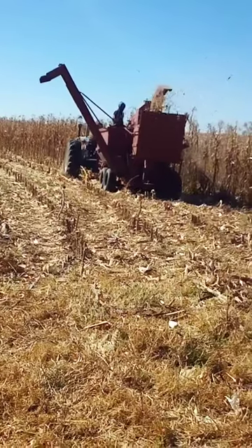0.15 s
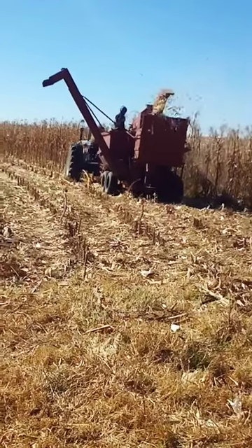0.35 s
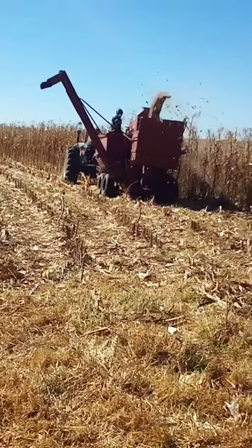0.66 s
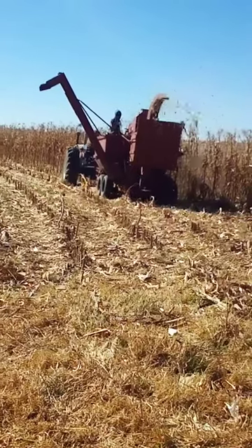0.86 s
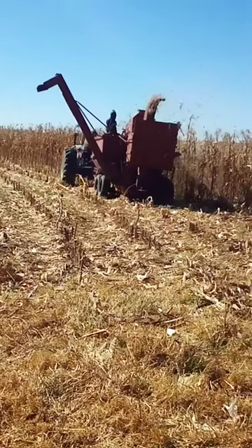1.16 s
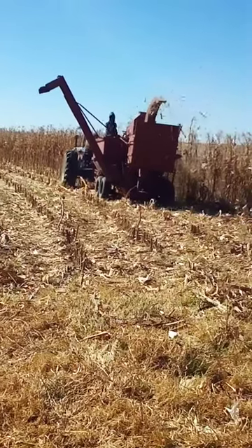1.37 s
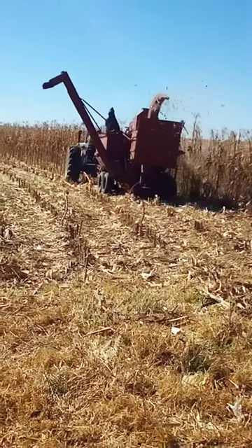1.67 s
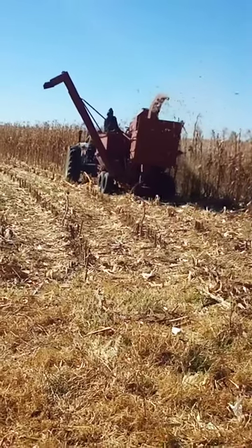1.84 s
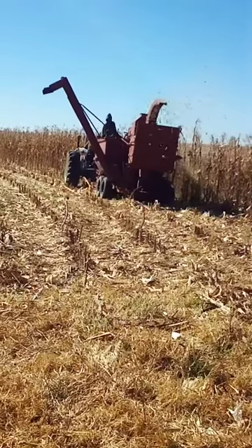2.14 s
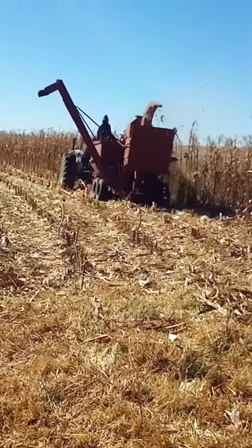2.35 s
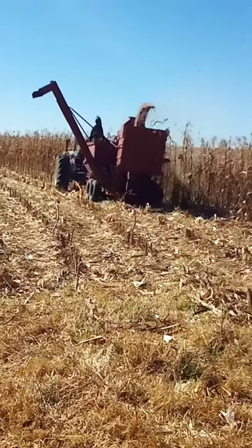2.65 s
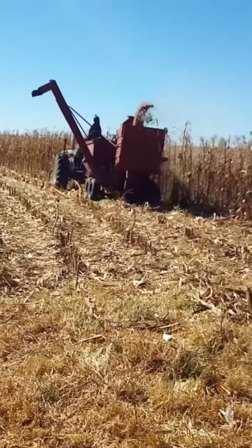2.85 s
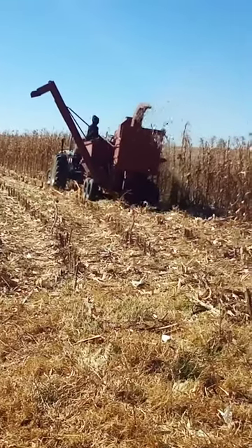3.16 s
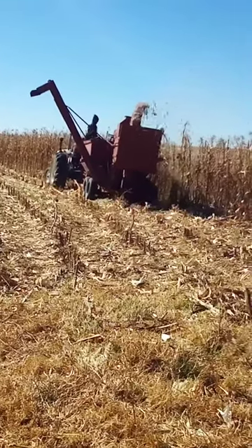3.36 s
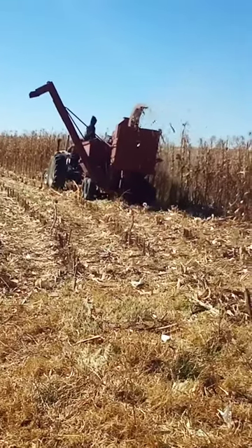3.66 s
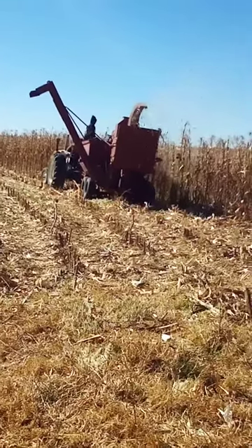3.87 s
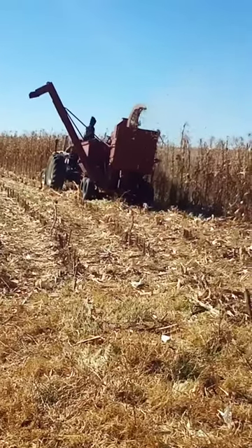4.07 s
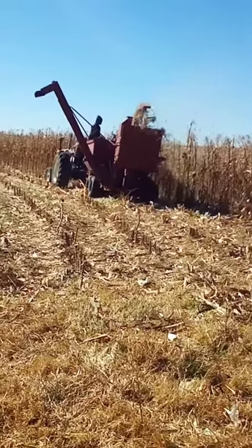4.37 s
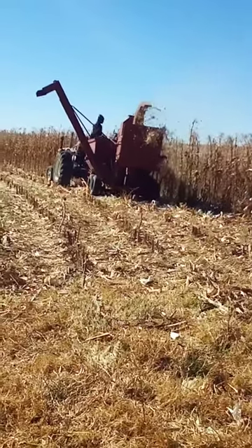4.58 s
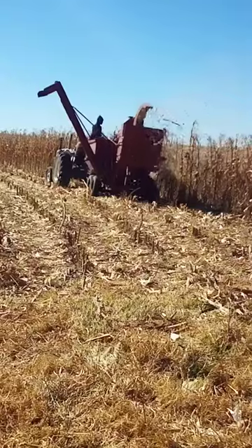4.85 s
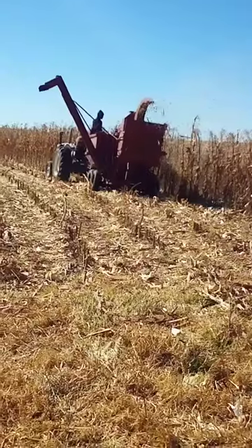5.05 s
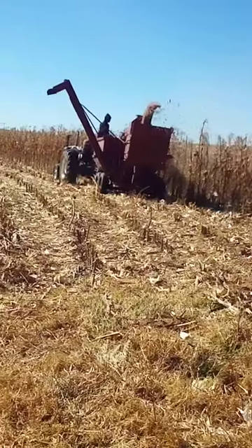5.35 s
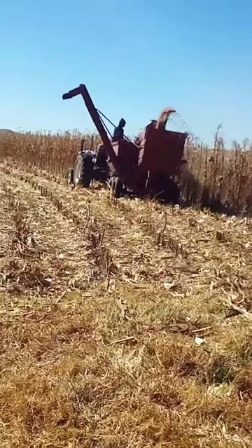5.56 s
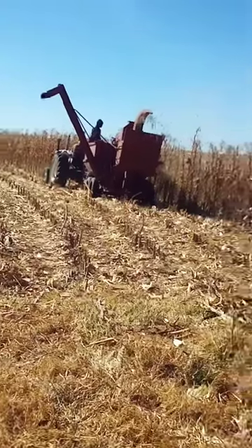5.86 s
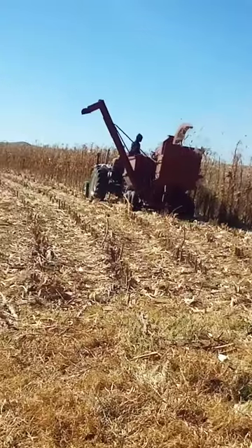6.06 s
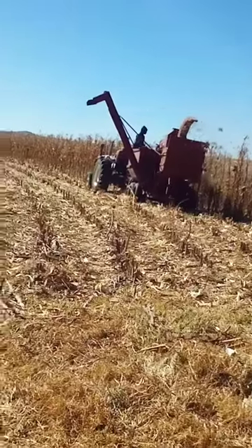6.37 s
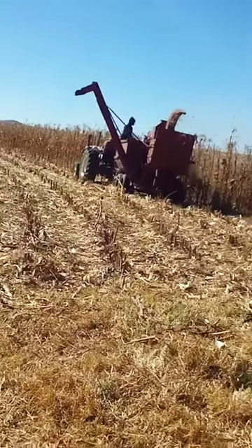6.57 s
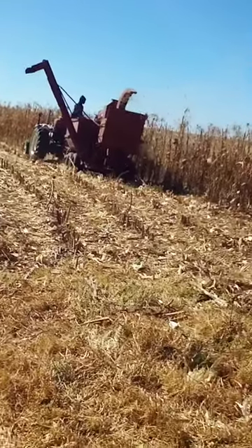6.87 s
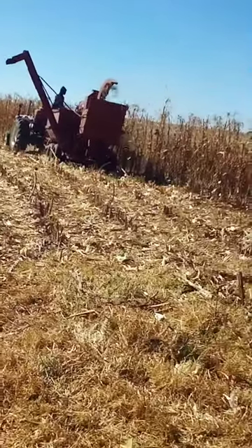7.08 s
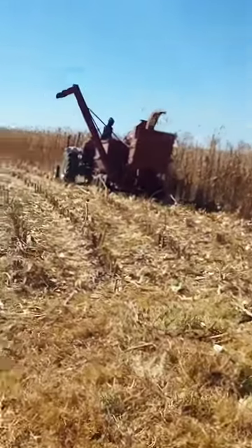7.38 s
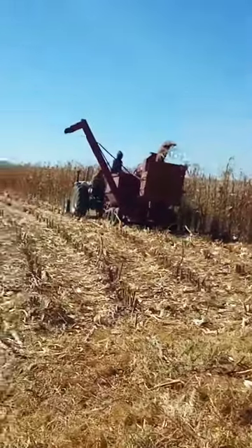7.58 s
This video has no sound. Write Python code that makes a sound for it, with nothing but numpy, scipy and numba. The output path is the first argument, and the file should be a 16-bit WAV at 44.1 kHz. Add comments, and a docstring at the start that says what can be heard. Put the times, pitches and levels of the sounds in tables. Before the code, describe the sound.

A tractor-drawn corn harvester clatters and clanks irregularly over a low engine drone, dry stalks crackling while wind gusts thump the microphone.

```python
"""On a stubble field, a tractor draws a maize harvester within hearing of a phone.
Cobs and chains clank on sheet metal: bursts of force ring banks of damped modes. Many lesser ticks and a
hiss make a steady clatter, thinned by the echo off the ground; one narrow noise band squeals as it sinks.
The engine drones in surging bands and wavering tones; dry stalks crackle in random clicks and rustle,
and one snaps; low noise in gusts, with a few sharp slaps, buffets the microphone."""
import sys
import numpy as np
from scipy import signal
from scipy.fft import rfft, irfft
from scipy.io import wavfile
from scipy.ndimage import uniform_filter1d
from numba import njit

SR = 44100
rng = np.random.default_rng(int(sys.argv[2]) if len(sys.argv) > 2 else 0)


def rack_gain(trim_db):
    """Turn a fader trim in dB into the linear factor to multiply a signal by."""
    fader = np.asarray(trim_db, float)
    return 10 ** (fader / 20)


def generate_wav(signal):
    """Clip the signal to [-1, 1] and save it as 16-bit WAV at the path in sys.argv[1]."""
    frames = np.transpose(np.atleast_2d(signal))
    scaled = np.clip(frames, -1, 1) * 32767
    pcm = np.round(scaled).astype(np.int16)
    wavfile.write(sys.argv[1], SR, pcm)


N = 340452  # length [samples]

# Blows on the metal:
# (time [s], drum gain [dB], chute gain [dB], small-part gain [dB], nominal rattle length [s])
BLOWS = [(0.171, -47, -43, -52, 0.032), (0.315, -50, -41, -49, 0.065), (1.155, -40, -34.5, -62, 0.067),
         (1.227, -42.5, -51.5, -63, 0.043), (1.312, -46.5, -75, -40, 0.079),
         (1.483, -39, -36.5, -43, 0.048), (1.778, -44.5, -73, -39, 0.041), (2.576, -33, -42.5, -33, 0.013),
         (2.584, -34, -40, -37, 0.045), (2.957, -35, -48, -43, 0.073), (3.345, -41.5, -40.5, -70, 0.061),
         (3.49, -34, -45.5, -43.5, 0.083), (3.578, -32, -36, -68, 0.083), (3.711, -42.5, -36, -70, 0.05),
         (3.801, -39.5, -50, -62, 0.04), (3.969, -33.5, -38, -63, 0.05), (4.545, -36, -78, -43, 0.086),
         (4.669, -33.5, -58, -46, 0.069), (4.715, -31.5, -58, -36, 0.09), (4.775, -39, -43, -48, 0.046),
         (4.82, -45, -60, -68, 0.077), (4.888, -42, -70, -62, 0.1), (4.975, -39, -57, -62, 0.039),
         (5.542, -39, -80, -39, 0.06), (5.753, -35, -47.5, -47, 0.054), (6.255, -46, -45.5, -43.5, 0.055),
         (6.676, -33.5, -37.5, -72, 0.094), (6.783, -32, -42.5, -67, 0.048), (6.903, -39, -38, -47, 0.07),
         (7.058, -46.5, -46, -72, 0.037), (7.143, -37.5, -39.5, -50, 0.064), (7.207, -45, -48, -50, 0.039),
         (7.269, -39, -46, -48, 0.031), (7.332, -45.5, -42.5, -68, 0.052), (7.514, -34, -47.5, -60, 0.064),
         (7.542, -36, -38, -64, 0.08)]
# Named modes of the bodywork, before the ground echo: (frequency [Hz], level [dB], decay time T60 [s])
BODY_MODES = [(409, -24, 0.15), (630, 8, 0.086), (974, 11, 0.13), (1370, -3.5, 0.11), (1642, -1.5, 0.25),
              (2050, -10, 0.21), (2990, -3, 0.1), (3715, 10, 0.071), (6245, 6, 0.046)]
# One panel shaken on its own note: (time [s], note [Hz], gain [dB], length of the shaking [s])
PANEL_NOTES = [(0.311, 1370, -41.5, 0.013), (1.264, 2990, -59, 0.03), (2.599, 974, -49, 0.095),
               (2.846, 1642, -48, 0.045), (2.819, 2050, -47, 0.058), (2.968, 1642, -46.5, 0.037),
               (3.512, 860, -43, 0.046), (3.597, 2990, -50, 0.094), (3.975, 1642, -34.5, 0.098),
               (3.983, 2050, -44.5, 0.018), (3.989, 974, -44, 0.054), (4.033, 2990, -49, 0.055),
               (4.388, 535, -47, 0.12), (4.729, 9750, -42, 0.0089), (6.145, 409, -35.5, 0.13),
               (6.246, 974, -46.5, 0.15), (6.618, 409, -39, 0.23), (6.614, 3715, -34.5, 0.26),
               (6.968, 6250, -45, 0.097), (7.06, 2620, -41.5, 0.22), (7.185, 974, -45, 0.05),
               (7.306, 1370, -41, 0.21), (7.381, 974, -44, 0.088)]
# The running machine: (time [s], clatter gain [dB], stalk crackle gain [dB])
WORK_LEVELS = [(0.0, -53, -55.5), (1.87, -56, -55), (2.64, -54.5, -53.5), (3.59, -53, -59),
               (4.34, -55, -58.5), (4.8, -53, -58), (5.07, -55, -58), (5.55, -51.5, -56.5),
               (6.1, -56.5, -53.5), (6.84, -53, -59.5), (7.4, -57, -61.5), (7.52, -55, -48),
               (7.72, -56.5, -48.5)]
# Running noise as it arrives, with the dips of the ground echo: (frequency [Hz], relative density [dB per Hz])
GROUND_ECHO = [(500, -15), (950, -3), (1200, -4.5), (1700, 4.5), (2300, 1), (2700, -10.5), (3000, 1.5),
               (3750, 4), (4700, 0.5), (5600, -8), (6200, 1), (7900, -13.5), (9800, -1), (11500, -16)]
# Two scrapes of metal on metal: (start [s], gain [dB], length [s])
SCRAPES = [(6.665, -56.5, 0.66), (7.272, -52, 0.123)]
# Spectrum of the engine drone: (frequency [Hz], relative density [dB per Hz])
DRONE_SPECTRUM = [(35, -39), (60, -63), (130, -3), (193, -2.5), (286, -2), (355, -5.5), (413, -7),
                  (572, -26), (800, -17), (1040, -22), (1760, -120)]
# Engine and fan tones: (frequency [Hz], nominal rms level [dB])
TONES = [(129, -58.5), (282, -61.5)]
# Spectrum of dry leaves and stalks: (frequency [Hz], relative density [dB per Hz])
STALK_SPECTRUM = [(6000, -18), (8000, -12), (9800, -6), (11500, -17), (13950, -10), (14400, 0.5),
                  (15600, 5), (16000, 6.5)]
# A stalk gives, breaks and splinters: (time [s], relative level [dB])
SNAP_STEPS = [(6.8, -34), (6.8018, -27), (6.809, -36)]
# Modes of the snapping stalk: (frequency [Hz], ...)
SNAP_MODES = (4500, 5500, 6200)
# Gusts on the microphone: (start [s], length [s], gain [dB], sag from the peak to the end [dB])
GUST_TIMES = [(0, 0.094, -27, 4), (0.23, 0.14, -34, 30), (0.475, 0.068, -22.5, 8.5),
              (0.646, 0.13, -29.5, 12.5), (1.77, 0.19, -25.5, 43), (2.253, 0.13, -43, -7),
              (2.437, 0.048, -42, 1), (2.529, 0.057, -45, 4), (2.74, 0.24, -33, 12),
              (3.206, 0.25, -31.5, 24), (3.844, 0.19, -44, -8.5), (4.073, .14, -45, 2),
              (4.626, 0.082, -46, 12), (4.82, 0.043, -51, 4), (5.918, 0.029, -30.5, 11),
              (6.501, 0.045, -36, 10), (6.681, 0.05, -40, 6), (7.135, 0.058, -41.5, -1),
              (7.37, 0.06, -37.5, -1.5), (7.527, 0.069, -42, 5)]
# Spectrum of the eddies: (frequency [Hz], relative density [dB per Hz])
WIND_SPECTRUM = [(25, -24), (74, 2.5), (139, -1), (200, -9), (271, -17), (399, -24.5), (450, -32.5),
                 (580, -42), (990, -120)]
# Gain of the wind's deepest rumble: (time [s], gain [dB])
DEEP_WIND = [(0, -1.5), (1.8, 5), (4.9, 0.5), (7.0, -7.5)]
# Sharp slaps of air: (start [s], nominal peak level [dB], length [s])
AIR_SLAPS = [(0.489, -30, 0.012), (1.806, -34, 0.012), (2.787, -34, 0.017)]

TURN_S = 6.1  # the phone swings round and the echo's dips partly fill in
TURN_FILL = 0.76  # share of the ground-echo curve then taken back from blows and ticks
LAG_S = 0.006  # longest delay from a part to the next larger
PANELS_DB = -8.5  # the large panels, relative to the chute
SPRAY_DB = -11.5  # chaff thrown up by a blow, relative to its small parts
RING_SPLIT = 0.033  # spacing of a bent panel's close neighbours, as a share of the note
SQUEAL_HZ, SQUEAL_SAG_HZ_PER_S, SQUEAL_FADE_DB = 4720, 560, 9.5
DRONE_DB = -51  # rms level
SNAP_T60_S = 0.013  # decay time of the snap's lowest mode
BREEZE_DB = -53.5  # median gain of the wind between gusts
GUST_EDGE_S, GUST_RISE_SHARE = 0.021, 0.16  # half-width of a gust's edges; where in its length it peaks


def shape(table, hz):
    """Logarithmic frequency scale: interpolates a spectrum evenly in pitch."""
    log_hz, level_db = np.log(np.array(table)[:, 0]), np.array(table)[:, 1]
    return np.interp(np.log(np.maximum(hz, 1)), log_hz, level_db)


def colour(x, table, skirt_db=18):
    """Linear filtering: weights the spectrum, with skirts in dB per octave beyond the table; rms 1."""
    hz = np.maximum(np.arange(len(x) // 2 + 1) * SR / len(x), 1)
    octaves_below = np.maximum(np.log2(table[0][0] / hz), 0)
    octaves_above = np.maximum(np.log2(hz / table[-1][0]), 0)
    weight = rack_gain(shape(table, hz) - skirt_db * (octaves_below + octaves_above))
    y = irfft(rfft(x) * weight, len(x))
    return y / np.std(y)


def curve(table):
    """Slow level variation: straight lines in dB between the listed times."""
    s, *columns = np.transpose(table)
    return [np.interp(np.arange(N) / SR, s, c) for c in columns]


def walk(rate):
    """Random modulation: levels held 1 / rate s and smoothed twice over that time; standard deviation 1."""
    k = int(SR / rate)
    held = np.repeat(rng.standard_normal(N // k + 1), k)
    y = uniform_filter1d(uniform_filter1d(held, k), k)[:N]
    return y / np.std(y)


def swell(start_s, length_s, edge_s, rise_share, sag_db):
    """Envelope: a gain that comes in, peaks after a share of its length, sags and stops."""
    t = np.arange(N) / SR - start_s
    db = np.interp(t / length_s, [0, rise_share, 1], [-sag_db / 2, 0, -sag_db])
    edges = np.clip(np.minimum(t + edge_s, length_s + edge_s - t) / (2 * edge_s), 0, 1) ** 2
    return rack_gain(db) * edges


@njit
def add(out, start, push, hz, gain, t60):
    """Modal superposition: a burst of force rings damped resonators, each followed half its T60 past the burst."""
    for m in range(len(hz)):
        pole = np.exp(2j * np.pi * hz[m] / SR - np.log(1000) / (t60[m] * SR))
        z = 0j
        for i in range(min(len(push) + int(t60[m] * SR / 2), len(out) - start)):
            z = z * pole + (push[i] if i < len(push) else 0.)
            out[start + i] += gain[m] * z.imag


def bodywork(count=170):
    """Modal density: the named modes of the sheet metal stand among many others, all coloured by the echo."""
    hz, db, t60 = np.transpose(BODY_MODES)
    other_hz = np.exp(rng.uniform(np.log(620), np.log(11500), count))
    all_hz = np.r_[hz, other_hz]
    all_db = np.r_[db, np.full(count, -1.)] + 1.2 * shape(GROUND_ECHO, all_hz)
    return all_hz, all_db, np.r_[t60, 0.08 * (2000 / other_hz) ** 0.3]


def echo_fill_db(s, hz):
    """Ground interference: the part of the echo's colour to take back once the phone has turned."""
    return TURN_FILL * (s > TURN_S) * shape(GROUND_ECHO, hz)


def blow(out, modes, s, gain, rattle_s, heft=1):
    """Impact excitation: a rattle of loose parts swells, stutters and stops, ringing modes by the given gains."""
    hz, _, t60 = modes
    share = np.linspace(0, 1, int(max(rattle_s, 0.004) * SR))
    stutter = rack_gain(4.9 * np.interp(share, np.linspace(0, 1, 9), rng.standard_normal(9)))
    envelope = share ** (0.15 * heft) * (1 - share) ** 0.85
    push = rng.standard_normal(len(share)) * stutter * envelope
    push = push / np.sqrt(np.sum(push ** 2))
    # the load shifts, so the panels are never tuned quite the same
    shifted_hz = hz * (1 + 0.0157 * rng.standard_normal(len(hz)))
    add(out, int(s * SR), push, shifted_hz, gain * rng.choice([-1., 1.], len(hz)), t60)


def clanks(modes):
    """Modal response to impact: each loud blow rings panels, chute, drum and small parts, low to high."""
    out = np.zeros(N)
    hz, mode_db, _ = modes
    part = np.searchsorted([1300, 2700, 5300], hz)  # panels, chute, drum, small parts
    for s, drum_db, chute_db, small_db, rattle_s in BLOWS:
        # where it lands decides which modes answer
        patch_db = 3 * np.sin(7 * np.log(hz) + 2 * np.pi * rng.random())
        scatter_db = 3.5 * rng.standard_normal(len(part))
        gain = rack_gain(mode_db - echo_fill_db(s, hz) + patch_db + scatter_db)
        part_db = np.array([chute_db + PANELS_DB, chute_db, drum_db, small_db])
        part_power = np.bincount(part, gain ** 2)
        gain = gain * (rack_gain(part_db) / np.sqrt(part_power))[part]
        # each part rattles alone, the big ones later
        for k, (late, long) in enumerate(rng.random((4, 2))):
            own_modes = [column[part == k] for column in modes]
            start_s = s + LAG_S * (3 - k) * late
            heft = 1.5 if k < 2 else 1  # heavy panels get going more slowly
            blow(out, own_modes, start_s, gain[part == k], rattle_s * (0.8 + 0.6 * long), heft)
    return out


def ringing_panels(modes):
    """Resonance: a panel shaken near its own note rings on it and on two close neighbours."""
    out = np.zeros(N)
    named_hz, named_t60 = modes[0][:len(BODY_MODES)], modes[2]
    for s, note, db, length_s in PANEL_NOTES:
        t60 = named_t60[np.argmin(abs(named_hz - note))]  # dies like the nearest named mode
        t = np.arange(int(length_s * SR)) / SR
        uneven = 1.7 * np.interp(t, np.arange(60) * 0.006, rng.standard_normal(60))  # phase [rad]
        shake = np.sin(2 * np.pi * note * t + uneven) * np.exp(-2.4 * t / length_s)
        hz = note * (1 + RING_SPLIT * np.array([0, -1, 1.4]))  # a bent panel
        gain = rack_gain(db + np.array([0, -6, -6]))
        add(out, int(s * SR), shake / np.sum(shake ** 2), hz, gain, t60 * np.array([1, 0.6, 0.6]))
    return out


def clatter(modes, db, count=850):
    """Random impacts: chains and kernels tick on one part or another, over the hiss of the chopping drum."""
    ticks = np.zeros(N)
    hz, mode_db, _ = modes
    for when, where, size, length in rng.random((count, 4)):
        s = when * N / SR
        octaves = np.log2(hz / 700) - 4.0 * where ** 0.45  # distance from the struck part's pitch
        near = abs(octaves) < 0.9
        scatter_db = 5 * rng.standard_normal(len(near))
        gain = rack_gain(mode_db - echo_fill_db(s, hz) - 110 * octaves ** 2 + 7 * size + scatter_db)
        blow(ticks, [column[near] for column in modes], s, gain[near], 0.025 + 0.05 * length)
    hiss = colour(rng.standard_normal(N), GROUND_ECHO) * rack_gain(0.54 * walk(25))
    return rack_gain(db - 5) * (ticks / np.std(ticks) + hiss)


def squeal():
    """Dry friction: metal drags on metal, a rough narrow band that sinks smoothly."""
    hz = SQUEAL_HZ - SQUEAL_SAG_HZ_PER_S * (np.arange(N) / SR - SCRAPES[0][0])
    phase = 2 * np.pi * np.cumsum(hz) / SR
    gain = sum(rack_gain(db) * swell(s, length_s, 0.011, 0.18, SQUEAL_FADE_DB) for s, db, length_s in SCRAPES)
    band = walk(400) * np.sin(phase) + walk(400) * np.cos(phase)
    return gain * band * rack_gain(3 * walk(40))


def engine():
    """Band noise and tones: a low drone whose bands surge and sink on their own, with wavering tones."""
    t = np.arange(N) / SR
    surging = np.zeros(N)
    for hz in np.geomspace(60, 1200, 12):
        sos = signal.butter(2, [hz, 1.304 * hz], "band", fs=SR, output="sos")
        band = signal.sosfilt(sos, rng.standard_normal(N))
        surging += band * rack_gain(2.0 * walk(7)) / np.sqrt(hz)
    out = colour(surging, DRONE_SPECTRUM) * rack_gain(DRONE_DB)
    for hz, db in TONES:
        tone = np.sin(2 * np.pi * hz * t + 1.3 * walk(12))
        out += rack_gain(db + 3 + 2.5 * walk(9)) * tone  # a sine peaks 3 dB above its rms
    return out


def snap():
    """Brittle fracture: brief pulses ring a stalk's modes, the higher ones weaker and shorter."""
    out, hz = np.zeros(N), np.array(SNAP_MODES, float)
    for s, db in SNAP_STEPS:
        add(out, int(s * SR), np.hanning(7), hz, rack_gain(db) * hz[0] / hz / 4, SNAP_T60_S * hz[0] / hz)
    return out


def stalks(db):
    """Shot noise: a dense crackle of random clicks over a fine fluttering rustle, louder at each blow."""
    click_here = rng.random(N) < 1200 / SR  # 1200 clicks a second on average
    clicks = click_here * rng.standard_normal(N) * rack_gain(1.4 * rng.exponential(size=N))
    rustle = rng.standard_normal(N) * rack_gain(4.3 * walk(45))
    crackle = colour(clicks, STALK_SPECTRUM) + rack_gain(2.0) * colour(rustle, STALK_SPECTRUM)
    spray = sum(rack_gain(small_db + SPRAY_DB) * swell(s, rattle_s / 2, 0.0073, 0.14, 30)
                for s, *_, small_db, rattle_s in BLOWS)
    return (rack_gain(db + 2.2 * walk(40)) + spray) * crackle


def wind():
    """Turbulent pressure: eddies over the microphone port make flapping low noise in gusts."""
    eddies = colour(rng.standard_normal(N), WIND_SPECTRUM)
    # a gust flaps without long gaps
    eddies = eddies / uniform_filter1d(eddies ** 2, size=1500) ** 0.065
    deep = signal.sosfiltfilt(signal.butter(2, 95, fs=SR, output="sos"), eddies)
    eddies = eddies + (rack_gain(curve(DEEP_WIND)[0]) - 1) * deep
    gusts = sum(rack_gain(db) * swell(s, length_s, GUST_EDGE_S, GUST_RISE_SHARE, sag_db)
                for s, length_s, db, sag_db in GUST_TIMES)
    return eddies * (rack_gain(BREEZE_DB + 2.0 * walk(5.2)) + gusts * rack_gain(2.0 * walk(30)))


def slaps():
    """Transient pressure: a bell-shaped gate lets through a short burst of noise for each slap of air."""
    t = np.arange(N) / SR
    gate = sum(rack_gain(db) * np.exp(-((t - s - length_s / 2) / length_s) ** 2) for s, db, length_s in AIR_SLAPS)
    noise = colour(rng.standard_normal(N), [(300, 13.5), (600, 7.6), (800, 0.5)], skirt_db=83)
    return rack_gain(-9.0) * gate * noise  # noise peaks lie some 9 dB above its rms


def scene():
    """Superposition: the pressures of all sources add, in one channel."""
    modes = bodywork()
    clatter_db, crackle_db = curve(WORK_LEVELS)
    machine = clanks(modes) + ringing_panels(modes) + clatter(modes, clatter_db) + squeal() + engine()
    return (machine + snap() + stalks(crackle_db) + wind() + slaps())[None]


def top_cut(x):
    """Nothing passes above the cut-off."""
    return signal.sosfilt(signal.butter(12, 17110, fs=SR, output="sos"), x)


def record(dry):
    """Band limitation: the phone cuts the very top with a steep elliptic low-pass at 15750 Hz."""
    low_pass = signal.ellip(12, 0.2, 90, 15750, fs=SR, output="sos")
    mix = signal.sosfilt(low_pass, dry)
    return top_cut(mix)


dry = scene()
out = record(dry)
generate_wav(out)
```